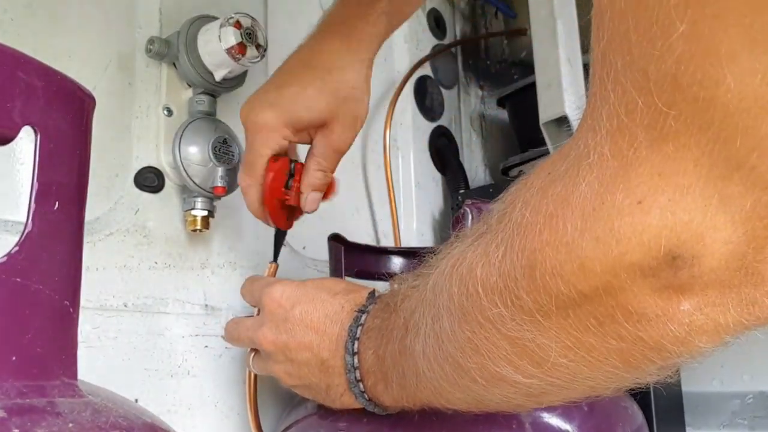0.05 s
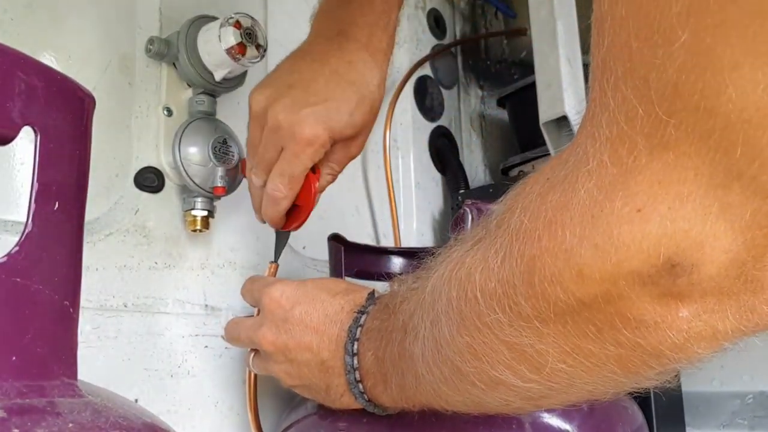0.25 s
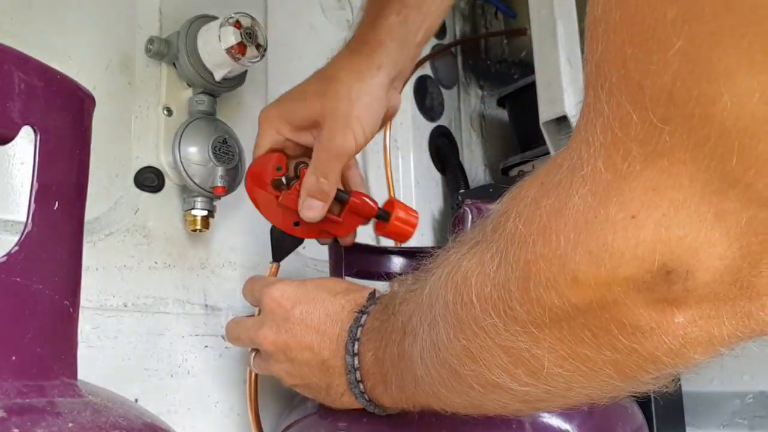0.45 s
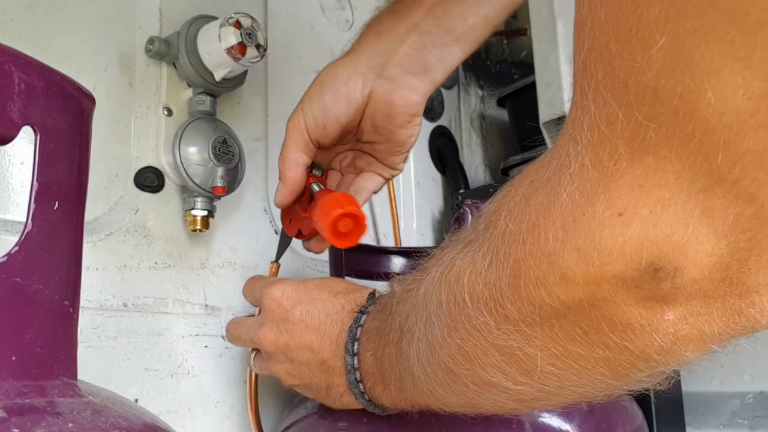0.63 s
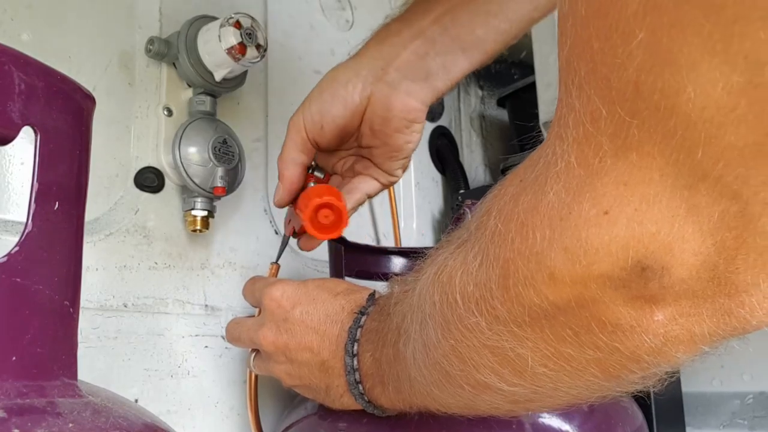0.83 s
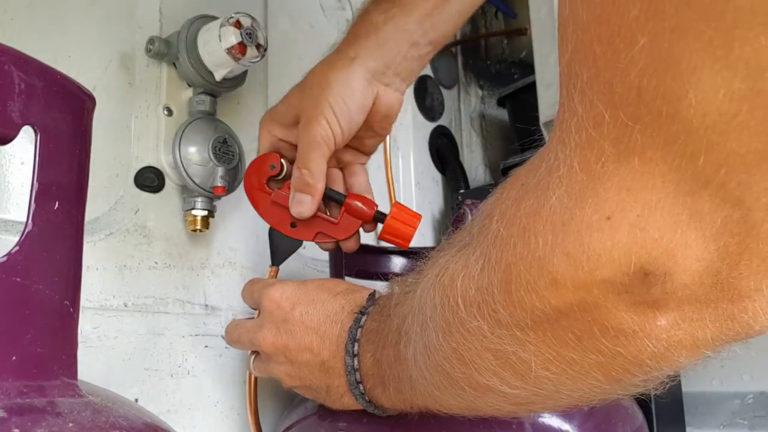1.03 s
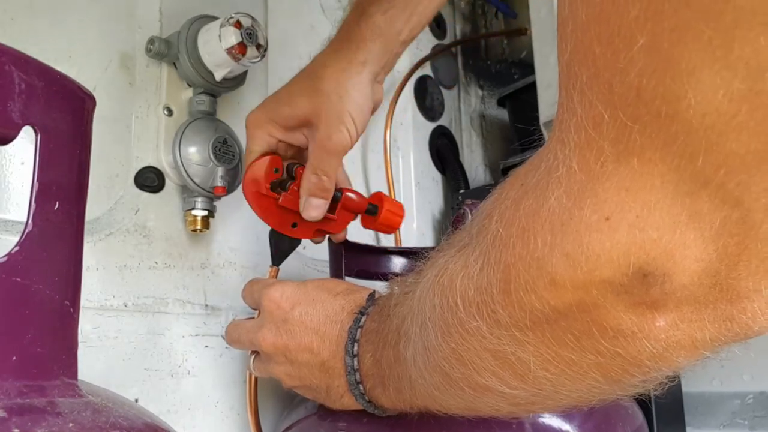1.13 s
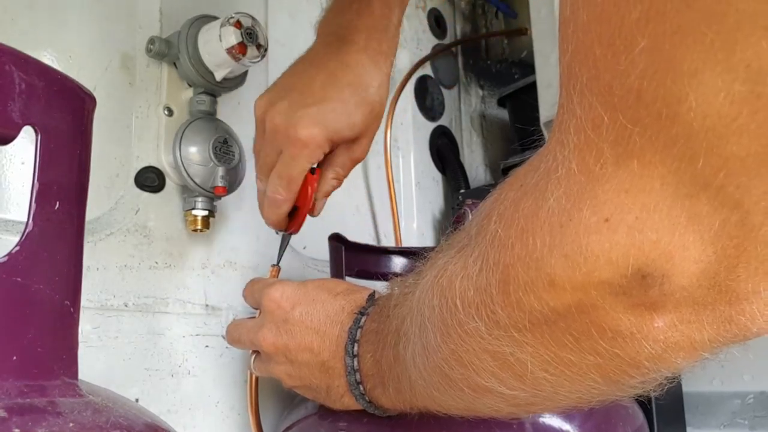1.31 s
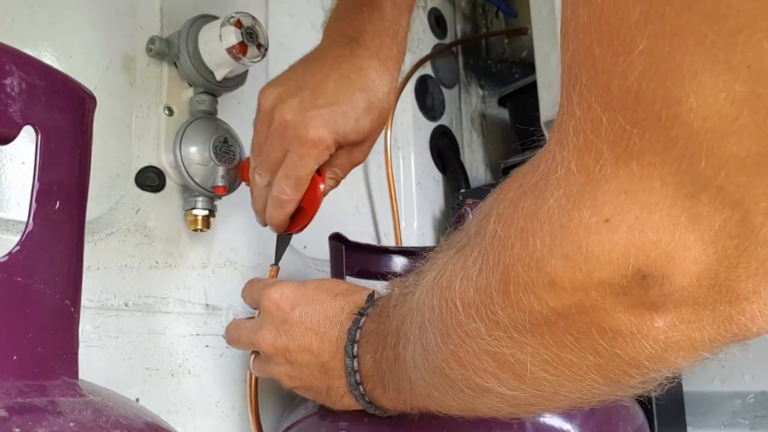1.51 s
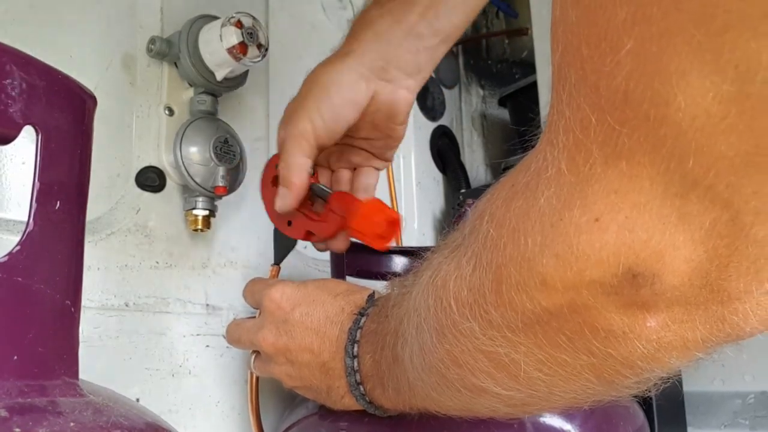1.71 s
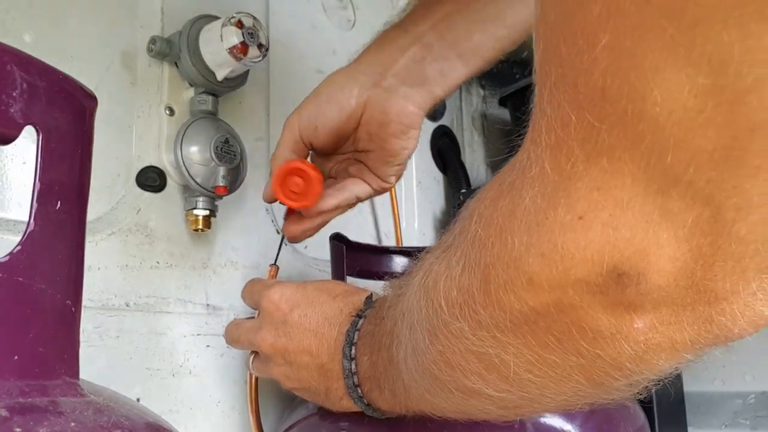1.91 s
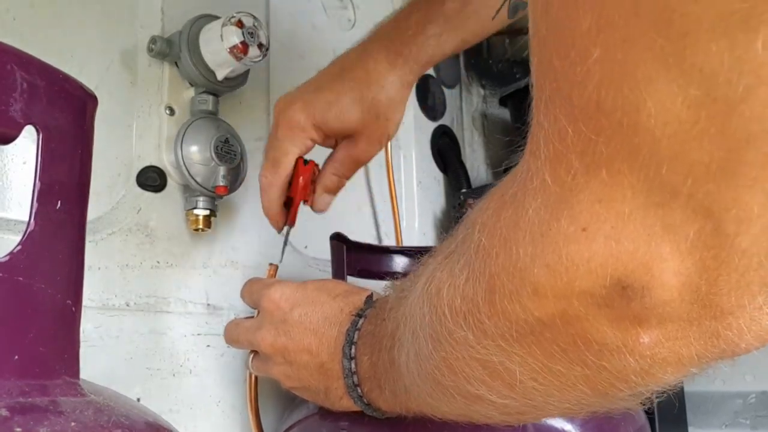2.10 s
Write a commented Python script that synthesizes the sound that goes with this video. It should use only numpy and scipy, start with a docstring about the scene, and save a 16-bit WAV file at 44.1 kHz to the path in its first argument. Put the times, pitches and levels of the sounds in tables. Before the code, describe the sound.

A small blade scrapes and clicks around a copper pipe's end, with two booming knocks.

```python
"""Inside a small compartment, a pipe cutter's deburring blade is twisted in the end of a copper pipe.
The blade rasps as it slips over the copper, sometimes clicks, and squeaks when it sticks.
Twice the pipe knocks with a click against the compartment wall, which booms and rattles.
A low hum, a rumble and a faint hiss lie underneath."""
import sys
import numpy as np
from scipy import signal
from scipy.fft import rfft, irfft
from scipy.io import wavfile

SR = 44100
rng = np.random.default_rng(int(sys.argv[2]) if len(sys.argv) > 2 else 0)


def store_wav(level_fs):
    """Save 16-bit WAV to argv[1]."""
    pcm = np.round(np.clip(np.atleast_2d(level_fs), -1, 1) * 32767)
    wavfile.write(sys.argv[1], SR, pcm.T.astype(np.int16))


N = 94815


def scraping(slips_per_s=2600, scatter_db=3.5, grip_hz=90, grip_db=2.05, size=16384):
    """Thousands of tiny slips rasp at the blade's edge, make the pipe groan and rumble in the wall."""
    # twists of the blade (peak time [s], rise [s], time to fall 20 dB [s],
    # rasp level [dB], groan level [dB], wall level [dB])
    twists = [(.02, 0.026, .25, -58.5, -71, -75), (0.101, .03, 0.15, -52, -62.5, -62),
              (0.17, 0.012, 0.22, -62, -52.5, -39.5), (0.369, 0.031, 0.23, -54.5, -52.5, -39.5),
              (0.496, 0.019, 0.1, -46.5, -55.5, -41), (0.581, 0.012, 0.22, -62, -63.5, -46),
              (0.658, 0.013, 0.05, -51, -54, -43), (0.699, 0.012, 0.09, -51, -51, -40.5),
              (.765, 0.02, 0.1, -58.5, -56.5, -44), (1.078, 0.0078, 0.1, -71, -66.5, -63),
              (1.338, 0.014, 0.27, -47, -57, -48), (1.367, 0.022, 0.14, -45.5, -47.5, -44.5),
              (1.612, 0.086, 0.2, -53.5, -53, -38.5), (1.68, 0.07, .11, -48, -41, -45.5),
              (1.755, 0.024, .08, -46, -56.5, -40.5), (1.814, 0.04, 0.1, -46, -39.5, -34.5),
              (1.893, 0.017, 0.07, -70, -47.5, -40), (2.024, 0.033, 0.24, -43, -38.5, -39),
              (2.052, 0.033, 0.07, -38, -33, -37), (2.099, 0.029, 0.05, -38, -35, -36)]
    # tone of the rasping edge (frequency [Hz], level [dB])
    rasp_colour = [(900, -22), (1900, -6.5), (2500, 5), (3050, 2), (3900, -0.5), (4600, 0.5), (7200, -3.5),
                   (8300, -15.5), (11300, -11), (13000, -15.5), (16000, -22)]
    # pitches at which the scraped pipe groans (frequency [Hz], width [Hz], level [dB])
    groan_peaks = [(464, 23, 6.5), (519.5, 21, 6), (843, 31, -1), (970, 76, -10), (1211.6, 19, 7),
                   (1361, 16, 0.5), (1633, 110, -4), (1949, 22, 6), (2180, 68, -14), (2504, 79, -3.5),
                   (2837, 28, -6.5)]
    # pitches at which the scraping shakes the wall (frequency [Hz], width [Hz], level [dB])
    wall_peaks = [(90, 19.5, 7), (173, 23, -8.5), (262.5, 30.3, -2.5), (408, 20, -16), (519.4, 29.4, -7),
                  (831, 25, -17)]
    slips = (rng.random(N) < slips_per_s / SR) * rng.choice([-1, 1], N)
    slips = slips * undb(scatter_db * np.minimum(rng.exponential(size=N), 4))  # a few are much stronger
    age, power = np.arange(size) / SR, np.zeros((3, N))
    for peak, rise, fall, *levels_db in twists:
        swell = np.minimum(age / rise, 1) * np.exp(-np.log(10) * np.maximum(age - rise, 0) / fall)
        add(power, peak - rise, (undb(levels_db)[:, None] * swell) ** 2)
    rasp_gain, groan_gain, wall_gain = np.sqrt(power)
    echoing_slips = compartment(slips, t60=0.052, direct_db=-8)
    rasp = unit(irfft(rfft(echoing_slips) * contour(rasp_colour), N))
    grip = undb(grip_db * walk(grip_hz))  # the pressure on the edge wavers
    groan, rumble = noise(resonances(groan_peaks)), noise(resonances(wall_peaks))
    return grip * rasp_gain * rasp + groan_gain * groan + wall_gain * rumble


def clicks(body_hz=1900, top_hz=8200, ring_octaves=.16, attack_s=0.00083, size=24576):
    """Sharp metal clicks, as the blade catches or the pipe strikes and bounces off the wall."""
    # metal clicks (time [s], level [dB], ring pitch [Hz], ring boost [dB], body boost [dB],
    # treble boost [dB], fade time [s], left minus right [dB])
    metal_clicks = [(0.2158, -27, 5040, 3, 2, -1.5, 0.077, -1), (0.4658, -37.5, 5060, 8, -5, 1.5, 0.11, 0),
                    (0.7446, -45, 5000, 2, -3, 1, 0.071, -2), (0.7579, -36, 8850, 7, -9, 5.5, 0.068, -0.5),
                    (1.2302, -35.5, 6670, 11.5, -12, 1.5, 0.075, -2),
                    (1.277, -43, 4950, -1, -6.5, -12, 0.076, 0.5),
                    (1.4327, -21, 2490, 10.5, 7, 1.5, 0.11, -1),
                    (1.4371, -25, 7050, -3, 7.5, 2.5, 0.07, -1), (1.453, -32.5, 2470, 19, 6, -11, 0.054, 4),
                    (1.6281, -31, 3250, 11, 0.5, -2, 0.11, -0.5),
                    (1.687, -29.5, 4600, -0.5, -7, 3, 0.059, -0.5),
                    (1.9432, -41, 6000, 5, 1, -3, 0.091, 1.5),
                    (1.9637, -31, 5900, 8, -8.5, 3.5, 0.052, -0.5),
                    (2.066, -30, 6800, 6, -17, 8.5, 0.042, -2), (2.078, -29.5, 4200, 8, -23, 2, 0.042, 0.5),
                    (2.1241, -35, 5600, 9, -19, -7, 0.082, -1.5)]
    # tone of steel on copper (frequency [Hz], level [dB])
    steel_colour = [(200, -23.5), (1000, -7.5), (1800, -8), (2500, -2), (4500, 0.5), (7300, -1),
                    (8300, -11), (11300, -9.5), (13000, -13.5), (16000, -21.5)]
    # ringing notes of the pipe and tool (frequency [Hz], relative level [dB], fade time [s])
    pipe_modes = [(1404, -8, 0.48), (1576, -7, 0.63), (1920, -11, .7), (2436, 0.5, 0.55),
                  (2492, -2.5, 0.78), (2523, 7.5, 0.34), (3250, 2, 0.28), (4040, -10, 0.38),
                  (4800, -3, 0.29), (5360, -11, 0.4), (5430, -5, 0.24), (7370, -1, 0.29), (11300, -18, .6)]
    f, out, steel = freqs(size), np.zeros((2, N)), contour(steel_colour, size)
    pipe = undb(-23.5) * ring(pipe_modes, size).sum(axis=0)
    crack, tail = undb(-6) * fade(0.02, size), undb(-21) * fade(0.37, size)
    attack = np.minimum(np.arange(size) / SR / attack_s, 1)
    body, top = 1 / (1 + (f / body_hz) ** 4), 1 / (1 + (top_hz / f) ** 8)
    for start, db, hz, ring_db, body_db, top_db, t60, pan_db in metal_clicks:
        ring_band = np.exp(-(np.log2(f / hz) / ring_octaves) ** 2)
        tone_db = ring_db * ring_band + body_db * body + top_db * top
        clack = noise(steel * undb(tone_db), size) * (fade(t60, size) + crack + tail)
        add(out, start, undb(db) * pan(pan_db) * attack * (clack + undb(body_db / 2) * pipe))
    return out


def squeaks(wobble=0.05, ramp_s=0.0027, echo_db=-9, size=6144):
    """The edge sticks and chatters on the copper, singing brief unsteady tones."""
    # moments when the blade sticks (time [s], length [s], pitch [Hz], level [dB])
    sticks = [(0.358, 0.035, 2590, -52), (0.649, 0.0286, 1208, -52), (1.227, .014, 4330, -47),
              (1.627, .014, 2547, -31.5), (1.644, 0.0098, 2550, -32.5)]
    age, out = np.arange(size) / SR, np.zeros((2, N))
    for start, length, hz, db in sticks:
        gate = np.clip(np.minimum(age, length - age) / ramp_s, 0, 1)
        tone = undb(db) * gate * sine(hz * (1 + wobble * walk(686, size)))
        add(out, start, tone + undb(echo_db) * compartment(tone, t60=0.24, direct_db=-27))
    return out


def knocks(bass_hz=220, middle_hz=674, middle_octaves=0.44, attack_s=0.0033, size=32768):
    """The pipe hits the wall, which booms and rattles; the first knock is deeper, the second thinner."""
    # blows on the wall, in two bunches (time [s], level [dB], extra bass [dB], rattle level [dB])
    blows = [(0.2146, -11.5, 5.5, -9), (0.2224, -18, 10.5, -17), (1.4325, -15, -4.5, -15),
             (1.4495, -24.5, -2, -24.5), (1.518, -27.5, 4.5, -32)]
    # ringing notes of the wall (frequency [Hz], relative level [dB], fade time [s])
    wall_modes = [(98.5, 1, 0.28), (167.3, -4, 0.33), (220.8, -5.5, .25), (254.2, -13.5, 0.37),
                  (275, -2.5, .15), (301.8, -7, 0.2), (402.4, -11, .21), (470.4, -14.5, 0.14),
                  (541.6, -21.5, 0.53), (603.4, -13, 0.26), (678, -37, 0.074), (810.3, -12, .12),
                  (842, -17.5, 0.16)]
    # tone of the wall's dull rattle (frequency [Hz], level [dB])
    rattle_colour = [(25, -25), (70, -6), (140, -0.5), (280, 1.5), (520, -5.5), (900, -20), (1400, -26.5),
                     (3000, -55)]
    out, modes, colour = np.zeros((2, N)), ring(wall_modes, size), contour(rattle_colour, size)
    hz = np.array(wall_modes)[:, 0]
    middle = np.exp(-(np.log2(hz / middle_hz) / middle_octaves) ** 2)
    facing = undb(np.outer(-8 * middle, [.5, -.5]))  # the middle notes are louder on the right
    attack = np.minimum(np.arange(size) / SR / attack_s, 1)
    decay = fade(0.088, size) + undb(-26.5) * fade(0.61, size)  # a short burst, then a faint tail
    for start, db, bass_db, rattle_db in blows:
        weights = undb(db + bass_db / (1 + (hz / bass_hz) ** 4))[:, None] * facing
        boom = (weights[:, :, None] * modes).sum(axis=0)
        rattle = undb(rattle_db) * decay * noise(colour, size)
        add(out, start, attack * (boom + rattle))
    return out


def compartment(x, t60, direct_db, size=4096):
    """The sound arrives directly and as quick echoes from the close walls."""
    echoes = noise(1, size) * fade(t60, size)
    echoes /= np.sqrt(np.sum(echoes ** 2) / 2)
    return undb(direct_db) * x + signal.oaconvolve(x[None], echoes, axes=1)[:, :len(x)]


def background(room_db=-49.5, hum_hz=117.9, hum_db=-49, waver_db=1):
    """A rumble, a faint hiss and a hum that wavers in pitch and loudness."""
    # tone of the rumble and hiss (frequency [Hz], relative level [dB])
    room_colour = [(20, -35), (58, 3.5), (85, -2.5), (125, -3.5), (170, -19), (280, -18.5), (600, -35.5),
                   (1400, -44.5), (2500, -40.5), (3300, -45.5), (5200, -39.5), (7300, -44), (8400, -51.5),
                   (11000, -42.5), (16000, -45.5)]
    hum = sine(hum_hz * (1 + 0.016 * walk(13.8)))
    return undb(room_db) * noise(contour(room_colour)) + undb(hum_db + waver_db * walk(18)) * hum


def undb(db):
    """Turn decibels into a gain to multiply by."""
    return 10 ** (np.asarray(db) / 20)


def unit(x):
    """Scale a sound to an average (rms) level of 1."""
    return x / np.sqrt(np.mean(x ** 2))


def freqs(size=N):
    """The frequencies of a spectrum, in Hz."""
    return np.maximum(np.arange(size // 2 + 1) * SR / size, 1)


def contour(points, size=N):
    """A gain for each frequency, made by joining (Hz, dB) points."""
    hz, db = np.array(points).T
    return undb(np.interp(np.log(freqs(size)), np.log(hz), db))


def resonances(peaks):
    """A gain for each frequency, with a peak wherever the object likes to vibrate."""
    f = freqs()
    return sum(undb(db) / (1 + ((f - hz) / width) ** 2) for hz, width, db in peaks)


def noise(colour, size=N, split_hz=624):
    """Shaped noise at two microphones: alike in the bass, different in the treble."""
    mid, side = rfft(rng.standard_normal((2, size)))
    side = side * (0.11 + 0.82 / (1 + (split_hz / freqs(size)) ** 2))
    return unit(irfft(np.array([mid + side, mid - side]) * colour, size))


def sine(hz):
    """A pure tone that follows a changing pitch."""
    return np.sqrt(2) * np.sin(2 * np.pi * np.cumsum(hz) / SR)


def ring(modes, size, apart_hz=1400):
    """The fading notes of a struck object; higher ones reach the two microphones out of step."""
    age, out = np.arange(size) / SR, []
    for k, (hz, db, t60) in enumerate(modes):
        sign = (-1) ** k
        skew = min(hz / apart_hz, 1) ** 1.07 * sign * np.array([[1], [-1]]) * rng.uniform(0.45, 1)
        out.append(sign * undb(db) * fade(t60, size) * np.sin(2 * np.pi * hz * age + skew))
    return np.array(out)


def fade(t60, size):
    """Die away by 60 dB in t60 seconds, the fade time."""
    return np.exp(-np.log(1000) * np.arange(size) / SR / t60)


def pan(db):
    """Left and right gains; positive decibels favour the left."""
    return undb(np.array([[db], [-db]]) / 2)


def walk(rate, size=N):
    """Drift to a new random value `rate` times a second."""
    steps = rng.standard_normal(1024)
    return np.interp(np.arange(size) * rate / SR, np.arange(len(steps)), steps)


def add(out, start, x):
    """Mix x into out from a start time in seconds."""
    i = max(int(start * SR), 0)
    out[..., i:i + x.shape[-1]] += x[..., :N - i]


def scene():
    """All the sounds at two microphones; knocks and background sit a little to the right."""
    return (knocks() + background()) * pan(-1.5) + clicks() + squeaks() + scraping()


def record(dry):
    """The microphone loses the deepest bass; the recorder clips at full scale and cuts the top treble."""
    bass_cut = signal.butter(2, 32.2, "high", fs=SR, output="sos")
    treble_cut = signal.ellip(10, .2, 80, 15900, fs=SR, output="sos")
    heard = signal.sosfilt(bass_cut, dry)
    return signal.sosfilt(treble_cut, np.clip(heard, -1, 1))


dry = scene()
out = record(dry)
store_wav(out)
```